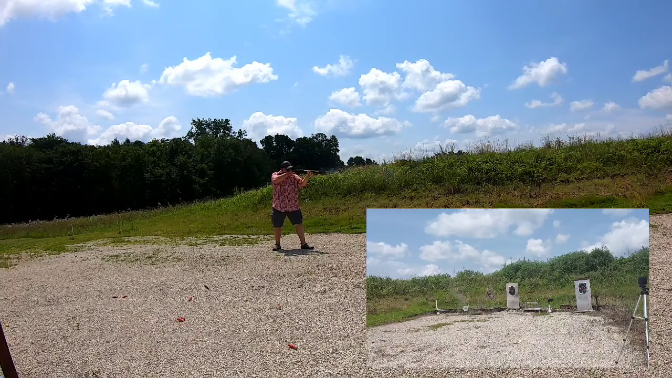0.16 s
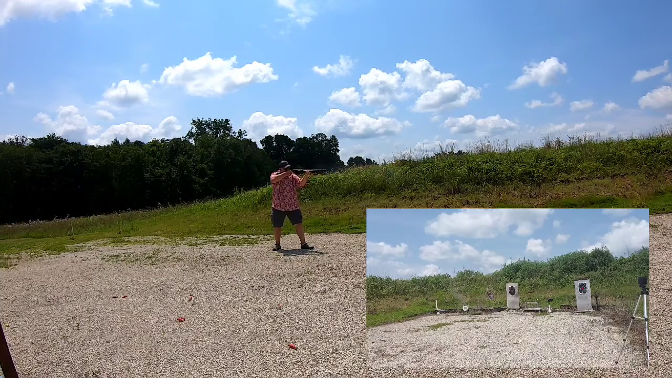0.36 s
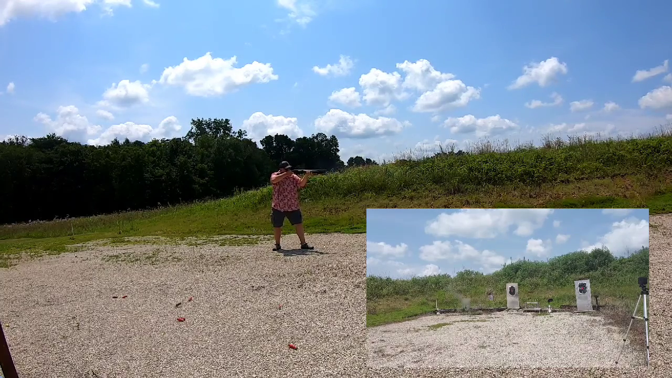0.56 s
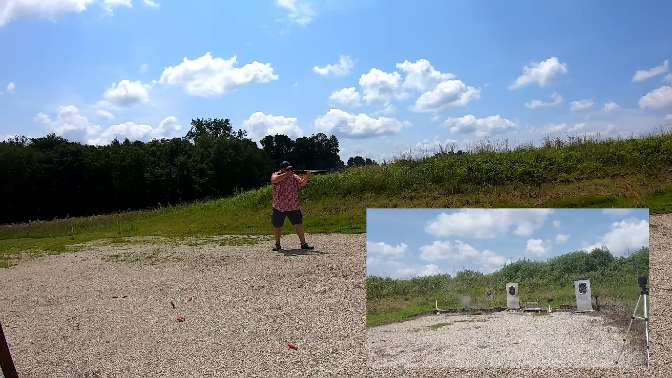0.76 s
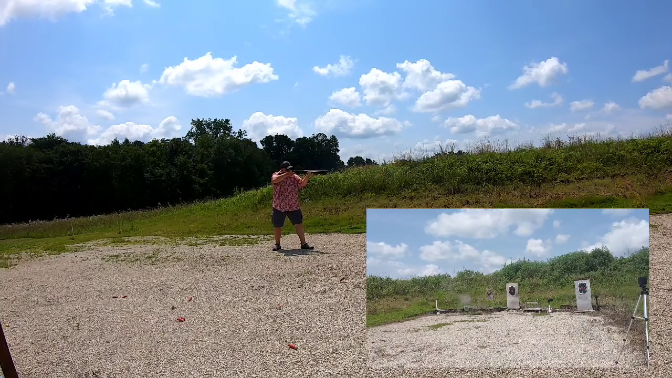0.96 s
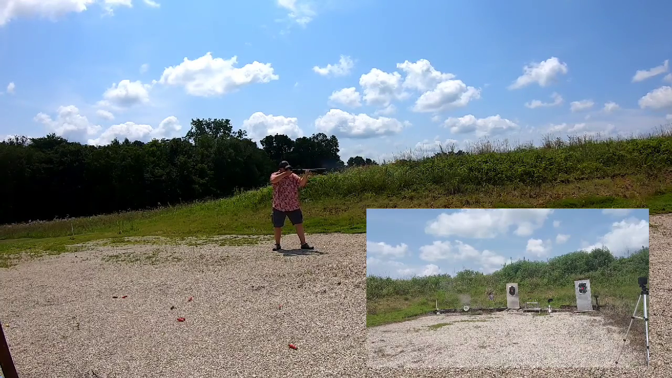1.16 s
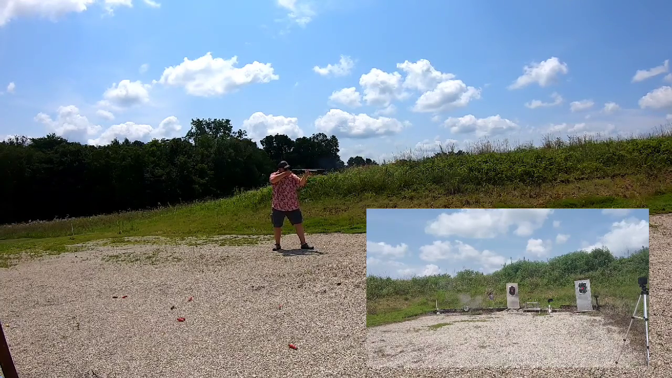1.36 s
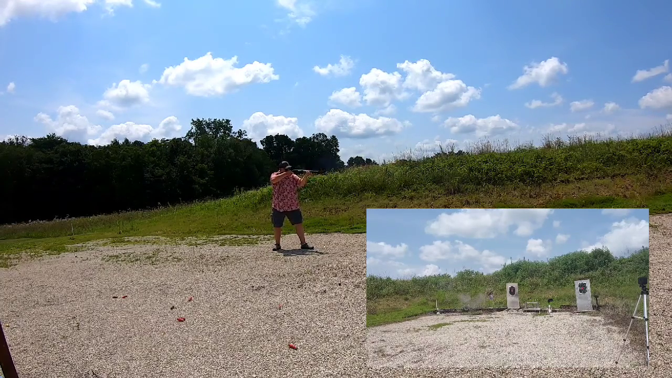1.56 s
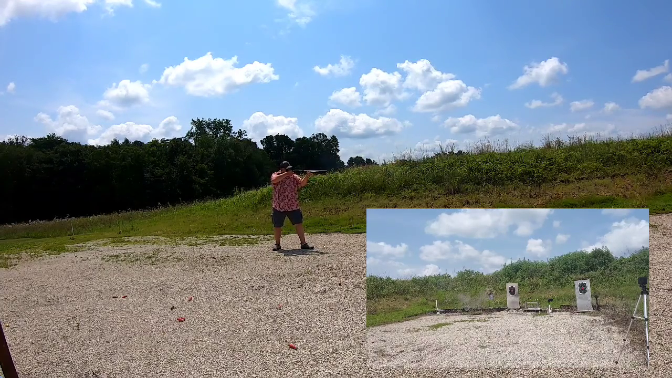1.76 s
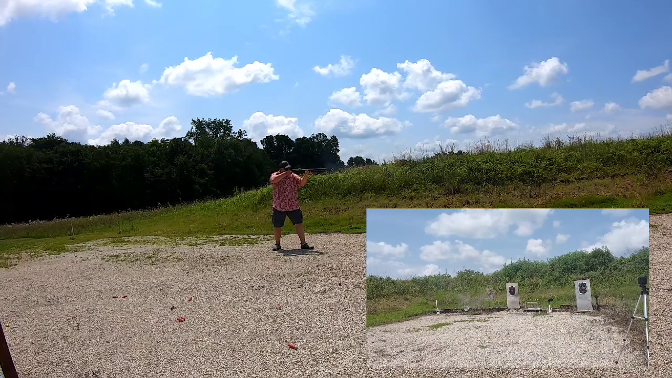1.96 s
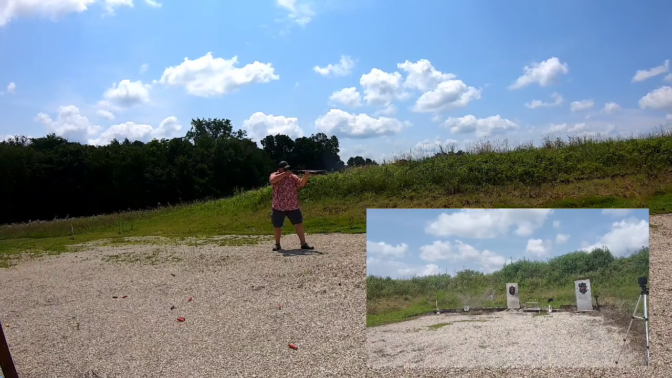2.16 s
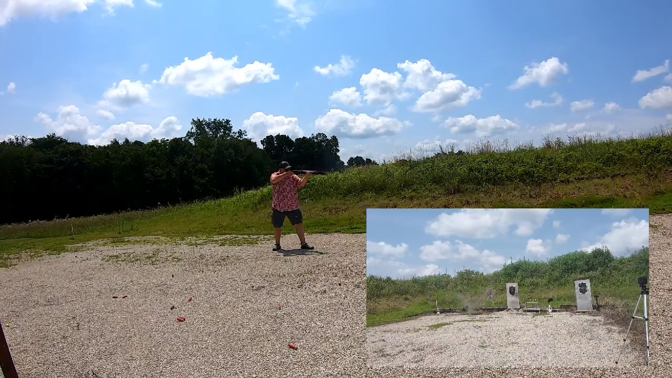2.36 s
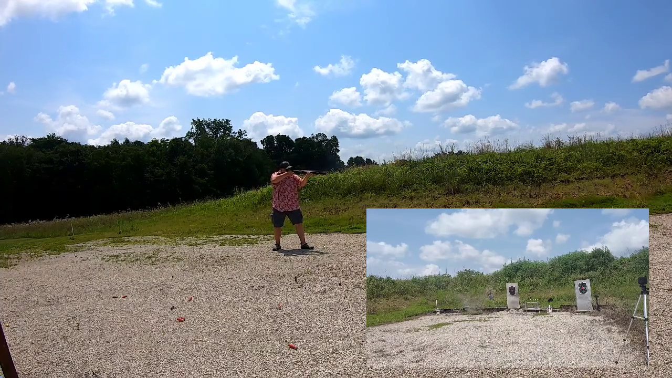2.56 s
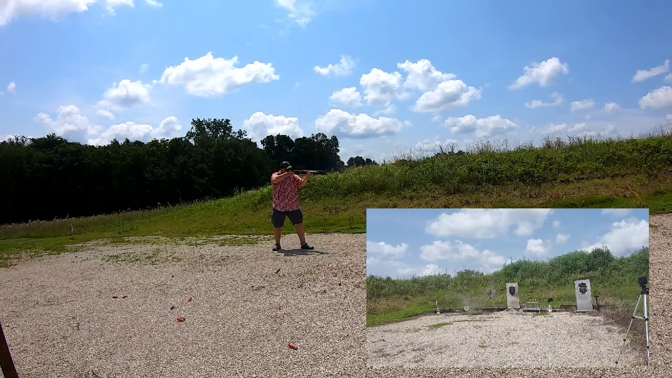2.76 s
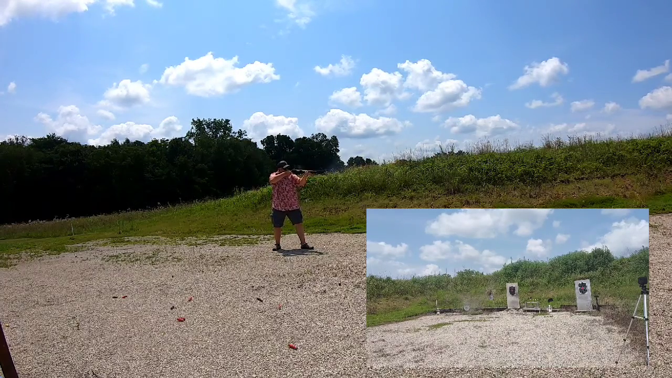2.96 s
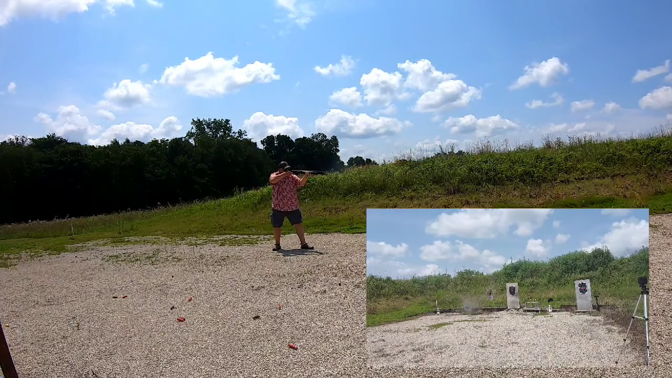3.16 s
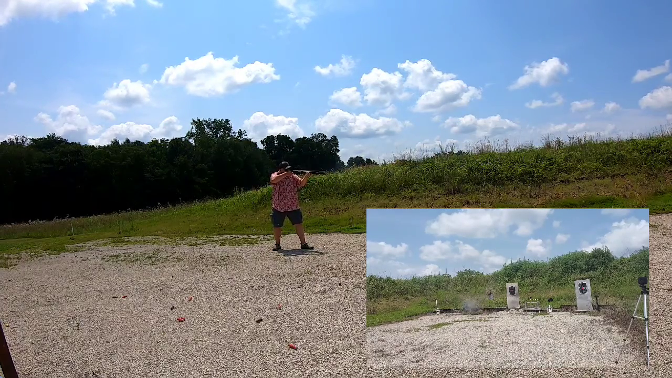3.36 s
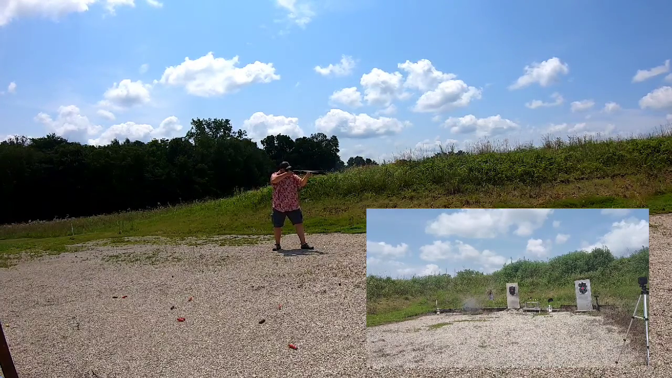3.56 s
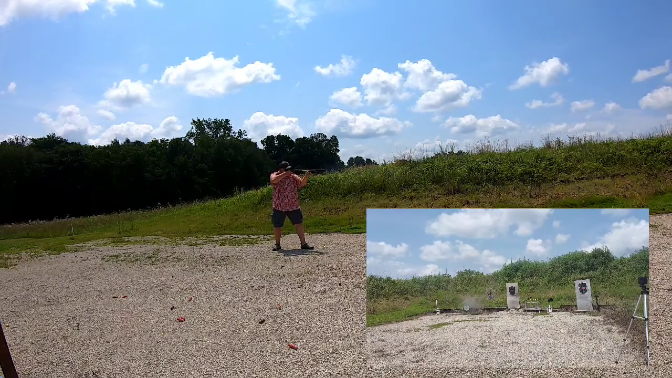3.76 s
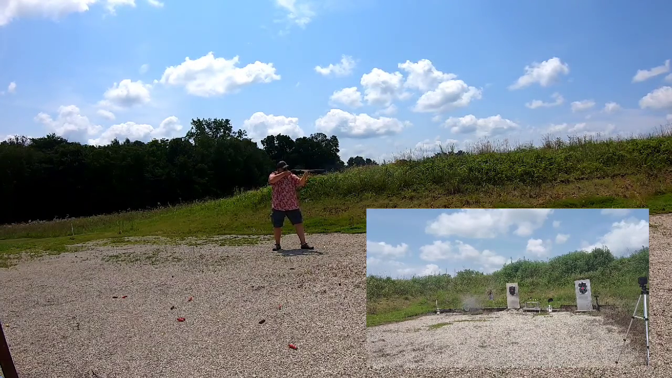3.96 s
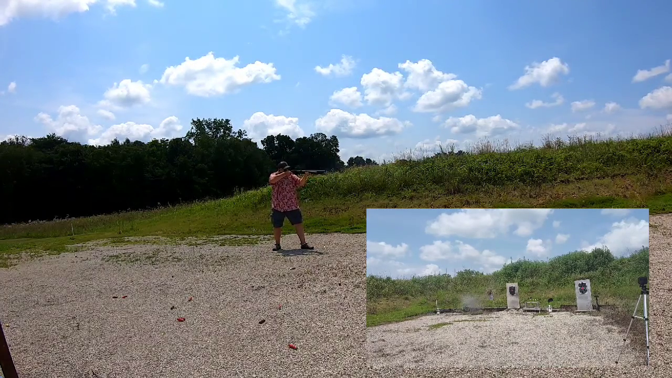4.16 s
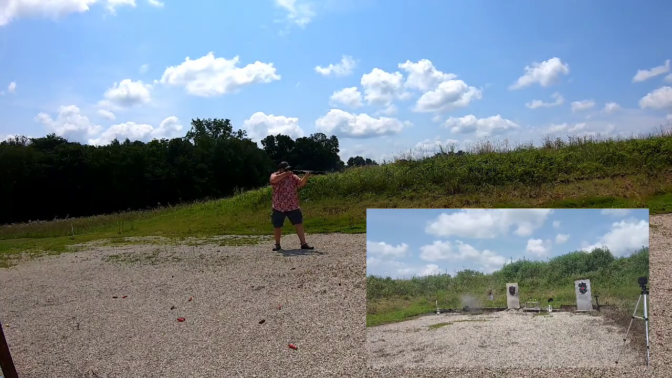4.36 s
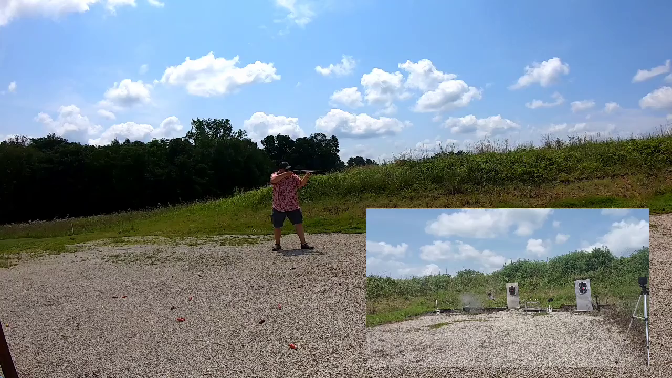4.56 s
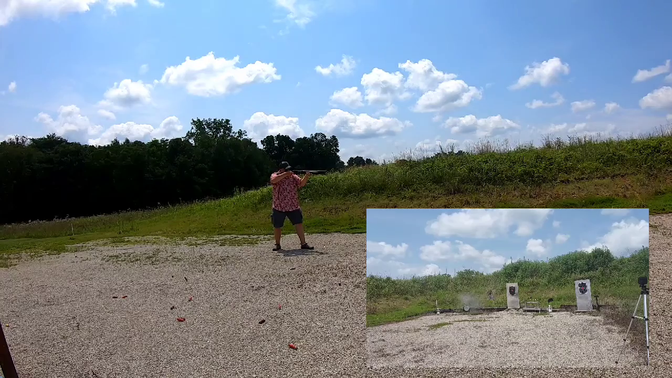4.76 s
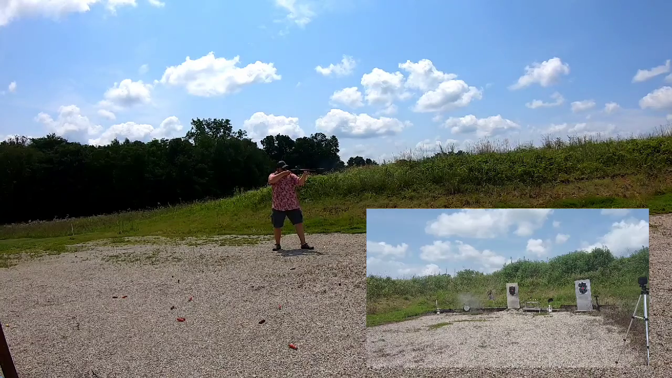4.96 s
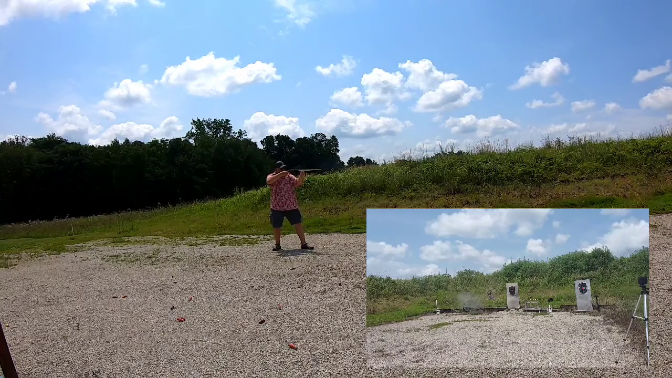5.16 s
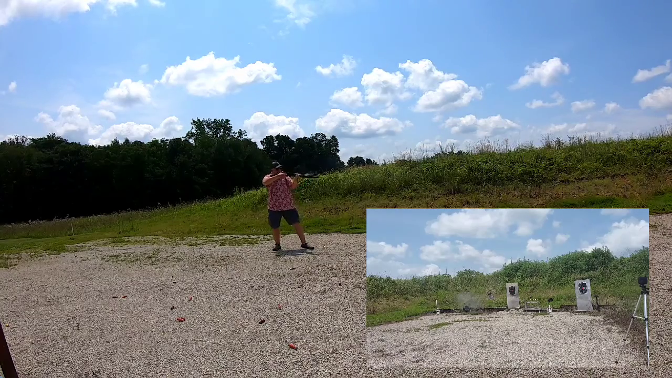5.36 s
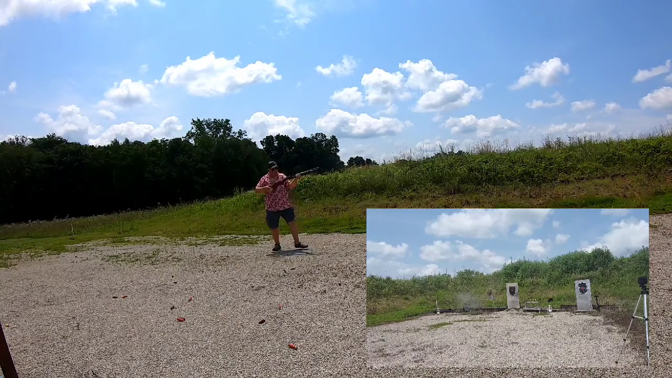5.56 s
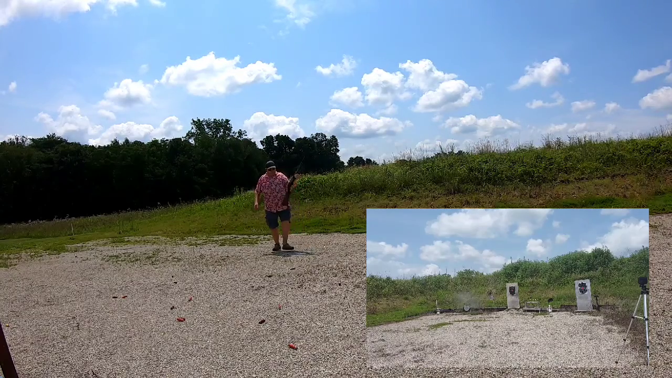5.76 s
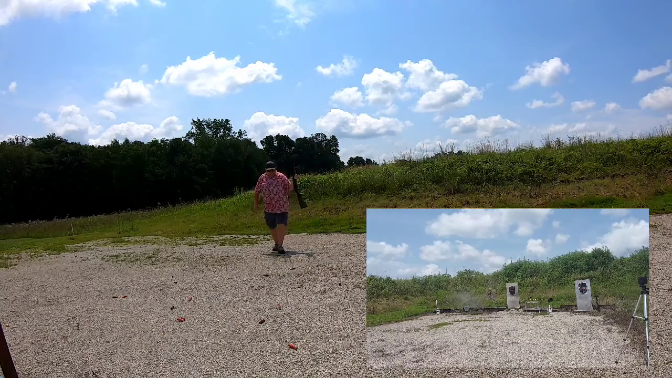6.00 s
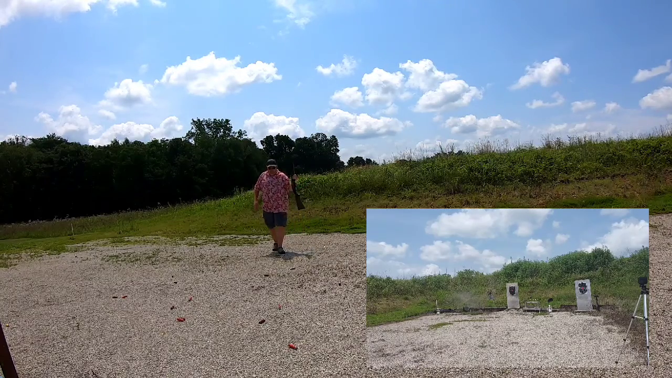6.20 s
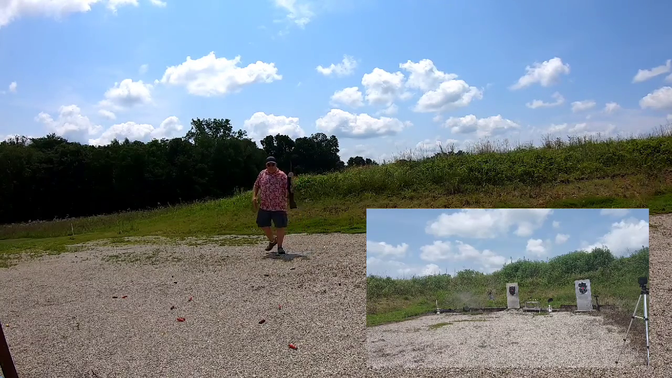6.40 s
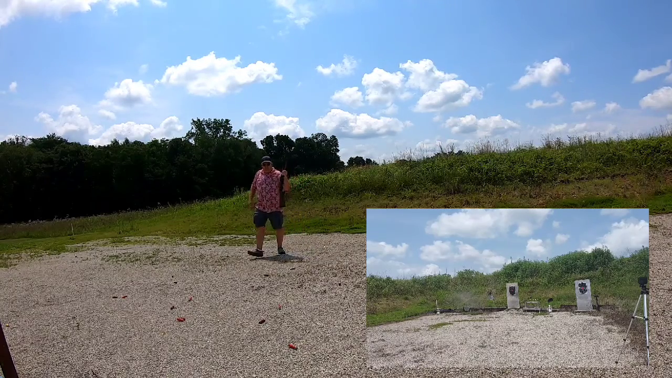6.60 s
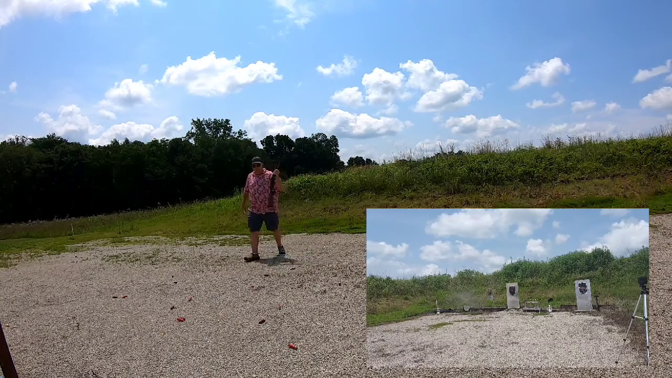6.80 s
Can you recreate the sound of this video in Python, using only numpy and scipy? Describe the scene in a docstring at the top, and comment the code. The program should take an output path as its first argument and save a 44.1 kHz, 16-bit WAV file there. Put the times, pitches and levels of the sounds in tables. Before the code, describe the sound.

Six booming, cracking shotgun shots come at an even pace in the open air, a few metres from a microphone that distorts on each one. After every blast the steel action rattles and rings softly, an echo rolls back from the woods, and a hollow shell drops lightly on gravel. After the last shot come a dull knock, a soft low bump, and a small squeak and click as the gun is lowered.

```python
"""An earlier shot is still rolling away over a gravel range, and an empty shell drops on the stones.
Then a semi-automatic shotgun fires six shots some metres off. Each blast overloads the microphone and
slaps off nearby surfaces; the gun's steel parts clack and ring, the shot comes back from an earth bank
and a line of woods, and another shell lands. Near the end come a few dull knocks and a low bump,
and the gun is lowered with a squeak and a last click."""
import sys
import numpy as np
from scipy import signal
from scipy.fft import rfft, irfft
from scipy.io import wavfile
from scipy.ndimage import uniform_filter1d

SR = 44100
rng = np.random.default_rng(int(sys.argv[2]) if len(sys.argv) > 2 else 0)


def wav_record(signal):
    """Record a signal, one row per channel, as 16-bit PCM in the file named by sys.argv[1]."""
    frames = np.transpose(np.atleast_2d(signal))
    bounded = np.clip(frames, -1, 1)
    # unit amplitude maps onto the largest positive 16-bit level
    quanta = np.round(bounded * 32767).astype(np.int16)
    wavfile.write(sys.argv[1], SR, quanta)


N = 301644
SHORT = 8192  # samples in one short sound
AGE_S, SHORT_HZ = np.arange(SHORT) / SR, np.fft.rfftfreq(SHORT, 1 / SR)
FRAME_S, FRAME_HZ = np.arange(N // 128 + 5) * 128 / SR, np.fft.rfftfreq(512, 1 / SR)  # grid for noise
BUILD_S = .002  # a burst takes this long to build


def amp(db):
    """Turns decibels into a gain."""
    return 10 ** (np.asarray(db) / 20)

def unit(x):
    """Scales a sound to the energy of one millisecond at full level."""
    return x * np.sqrt(SR / 1000 / np.sum(abs(x) ** 2))

def read(table, hz):
    """Looks up a table's value at any pitch, sliding between its rows."""
    pitch_hz, value = np.transpose(table)
    return np.interp(np.log(hz + 1), np.log(pitch_hz + 1), value)

def sides(pan_db):
    """Left and right gains with a steady total power; a pan above zero leans left."""
    gains = np.array([amp(pan_db / 2), amp(-pan_db / 2)])
    return gains / np.sqrt(np.mean(gains ** 2, axis=0))

def add(mix, start_s, sound, pan_db=0):
    """Mixes a sound in, cutting off whatever falls outside the scene."""
    start = round(start_s * SR)
    sound = (sound * sides(pan_db)[:, None])[:, max(-start, 0):]
    part = mix[:, max(start, 0):][:, :sound.shape[1]]
    part += sound[:, :part.shape[1]]

def envelope(t, swell_s, hold_s, fade_db_per_s):
    """A gain that is silent before time zero, swells, holds, then fades."""
    return np.clip(t / swell_s, 0, 1) * amp(-fade_db_per_s * np.maximum(t - swell_s - hold_s, 0))

# How alike the left and right microphones hear scattered sound: pitch_hz, likeness
LIKENESS = [(30, .5), (70, .98), (150, 1), (270, .995), (400, .95), (900, .6), (2200, 0.43), (5500, 0.27),
            (13000, 0.087)]
# How much of a pan they pick up: pitch_hz, share
PAN_SHARE = [(280, 0), (500, 0.7), (900, 0.99), (2500, 0.019), (6000, 0.049), (12000, 0.29)]
def wash(level, tone, pan_db, patchy_db, lowest_hz=55):
    """Scattered sound: patchy noise that follows a level, its bass alike on both sides."""
    a, b, c, d, patches = rng.standard_normal((5, len(FRAME_S), len(FRAME_HZ)))
    patches = uniform_filter1d(uniform_filter1d(patches, size=4, axis=0), size=14, axis=1)
    alike = read(LIKENESS, FRAME_HZ)
    left = a + 1j * b
    right = alike * left + np.sqrt(1 - alike ** 2) * (c + 1j * d)
    colour = amp(read(tone, FRAME_HZ))
    frames = np.array([left, right]) * colour / np.linalg.norm(colour)
    frames *= sides(pan_db * read(PAN_SHARE, FRAME_HZ))[:, None]
    frames *= level[:, None] * amp(patchy_db * patches / patches.std())
    noise = np.sqrt(1.5) * signal.istft(frames.transpose(0, 2, 1), nperseg=512, noverlap=384)[1][:, :N]
    return signal.lfilter(*signal.butter(2, lowest_hz, 'high', fs=SR), noise)

# The shots, the first fired before the scene begins; each db value turns one part up or down:
# start_s, body_db, crack_db, last_slap_delay_s, last_crackle_db, echo_db
SHOTS = [(-.205, 0, 0, .049, 0, 1), (0.6569, 2, -2, 0.05, -3.5, -0.5), (1.5577, 1.5, -1.5, .0484, -1, 0),
         (2.3765, 0.5, -1, 0.049, -4.5, -0.5), (3.293, 1.5, -2.2, .0484, -7, -0.5),
         (4.2295, 1.5, -2, 0.05, -4, -0.5), (5.2983, 1, -1.5, 0.048, -12, -0.5)]
# The echo from each place: delay_s, swell_s, hold_s, level_db, fade_db_per_s
ECHOES = {"gravel": (.002, .008, .052, -39.6, 215), "bank": (.19, .024, .004, -44.3, 150),
          "woods": (.266, .052, .046, -42.3, 69), "far": (.33, .09, .11, -49.6, 26)}
# The tone each place sends back: pitch_hz, level_db
GRAVEL_TONE = [(30, -2), (90, -3), (200, -5), (350, -9.5), (600, -14.5), (1200, -18.5), (3000, -15.5),
               (5000, -23.5), (7000, -27.5), (9500, -30.5), (12500, -38), (15000, -57)]
BANK_TONE = [(18, -52), (30, -28.5), (130, 7.5), (275, -17.5), (365, -30), (460, -19.5), (551, -35),
             (712, -16.5), (1290, -17), (2720, -11.5), (9350, -33), (12700, -48), (14100, -72)]
WOODS_TONE = [(18, -68), (30, -32), (54, -13.5), (141, -7), (177, -2), (202, -2), (415, -16.5), (610, -14),
              (731, -6.5), (1220, -0.5), (1540, -5.5), (3090, -7), (9110, -26.5), (12700, -38.5),
              (14100, -72)]
FAR_TONE = [(20, -24.5), (60, -14), (130, 4.5), (220, -1), (400, -7.5), (580, -8.5), (750, -4),
            (1250, -5.5), (1700, -8), (3600, -13.5), (5500, -27.5), (9000, -38.5), (12400, -45),
            (14100, -64.5)]
def echoes():
    """Every shot scatters back from the gravel, the bank, the woods and the far country."""
    def level(place):
        delay_s, swell_s, hold_s, level_db, fade_db_per_s = ECHOES[place]
        power = 0
        for start_s, *_, echo_db in SHOTS:
            shape = envelope(FRAME_S - start_s - delay_s, swell_s, hold_s, fade_db_per_s)
            power += (amp(level_db + echo_db) * shape) ** 2
        return np.sqrt(power)
    return (wash(level("gravel"), GRAVEL_TONE, pan_db=-11.5, patchy_db=4.5)
            + wash(level("bank"), BANK_TONE, pan_db=5, patchy_db=4.5)
            + wash(level("woods"), WOODS_TONE, pan_db=19, patchy_db=1.84)
            + wash(level("far"), FAR_TONE, pan_db=6.5, patchy_db=2.06))

# The hush of the open air: pitch_hz, level_db
AIR_TONE = [(18, -33), (30, -3), (70, 0), (207, -10.5), (346, -27.5), (1500, -22), (2940, -32),
            (6190, -42.5), (8880, -43), (14100, -56.5)]
def still_air(level_db=-60.5):
    """A faint, low, steady noise lies under everything."""
    return wash(np.full(len(FRAME_S), amp(level_db)), AIR_TONE, pan_db=-1.5, patchy_db=1.5)

def pulse(tone):
    """The shortest push of air that has this tone."""
    log_gain = np.log(amp(read(tone, abs(np.fft.fftfreq(SHORT, 1 / SR)))))
    spectrum = np.exp(np.conj(signal.hilbert(log_gain)))  # each pitch comes as early as it can
    return unit(np.fft.ifft(spectrum).real)

# How differently the two microphones hear a close sound: pitch_hz, difference_db
SIDE_DIFFERENCE = [(700, -8.5), (1300, -6.5), (2500, -10), (6000, -9), (9000, 0), (12000, -12)]
def burst(tone, decay_s, apart):
    """A puff of churning air builds and dies; `apart` makes left and right less alike."""
    t = AGE_S - BUILD_S
    shape = np.exp(np.where(t < 0, t * 4000, -t / decay_s))
    shared, different = rfft(rng.standard_normal((2, SHORT)) * shape)
    spectrum = shared + apart * amp(read(SIDE_DIFFERENCE, SHORT_HZ)) * np.array([different, -different])
    evened = spectrum / (abs(spectrum) + 1e-9) ** .6
    puff = irfft(evened * rfft(pulse(tone))) * (AGE_S < AGE_S[-1] / 2)
    return np.sqrt(2) * unit(puff)

# Empty shells landing: start_s, pop_db, grit_db, pan_db
SHELLS = [(.5, -42.5, -42, 1), (1.246, -43, -43, -2), (1.364, -50, -50, -3), (2.295, -42, -50, 3),
          (3.024, -37, -44, -1), (3.05, -60, -53, 2), (3.976, -53, -47, -2), (4.924, -46, -40, -1),
          (5.99, -47.5, -45.5, 1)]
# A gritty crackle, also heard on the slaps: pitch_hz, level_db
CRACKLE_TONE = [(300, -15.5), (1000, 4), (2300, 0), (4000, -1), (6000, -5.5), (9000, -12), (13000, -29),
                (15000, -46)]
def falling_shells(tube_hz=1290, ring_s=.039):
    """Each hollow shell pops near its tube's pitch and scuffs the gravel."""
    out = np.zeros((2, N))
    for start_s, pop_db, grit_db, pan_db in SHELLS:
        pop = np.sin(2 * np.pi * tube_hz * rng.uniform(.97, 1.03) * AGE_S)
        add(out, start_s, pop * amp(pop_db - 60 * AGE_S / ring_s), pan_db)
        add(out, start_s - BUILD_S, amp(grit_db) * burst(CRACKLE_TONE, decay_s=.0035, apart=1.2), pan_db)
    return out

def from_right(x, lag_s):
    """The left microphone hears a sound from the right a moment later."""
    return np.array([np.interp(AGE_S - lag_s, AGE_S, x, left=0), x])

# The push of the gas, its hollow bark and the shock wave's crack: pitch_hz, level_db
BOOM_TONE = [(15, -10.5), (40, -0.5), (90, -3.5), (150, 6.5), (220, -6), (330, -15.5), (600, -26),
             (2000, -55.5)]
BARK_TONE = [(150, -35), (350, -21), (480, -7.5), (620, -3.5), (800, 1.5), (920, -4), (1080, -16.5),
             (2500, -49)]
CRACK_TONE = [(300, -32.5), (900, -10.5), (1300, 2), (2200, 1.5), (3000, 1), (3800, -1), (5000, -7),
              (6300, -11), (7500, -19.5), (9300, -17), (10500, -28), (13000, -25.5), (14500, -48)]
def blasts(stutter_gap_s=.0103, dull_hz=4400, bounce_s=.001368):
    """After a faint tick, boom, bark and crack stutter in; the crack bounces off the gravel."""
    out = np.zeros((2, N))
    boom = amp(-6.3) * from_right(pulse(BOOM_TONE), lag_s=.00016)
    bark = amp(-4.2) * from_right(pulse(BARK_TONE), lag_s=.0001)
    dull = signal.butter(1, dull_hz, fs=SR)
    for start_s, body_db, crack_db, *_ in SHOTS:
        tick = amp(-47) * burst(CRACK_TONE, decay_s=.0015, apart=.9)
        add(out, start_s - .0425 - BUILD_S, tick)
        for step in range(4):  # step 0 is the main blast; the others come earlier and weaker
            at_s, drop = start_s - step * stutter_gap_s, step ** 1.25
            if step == 0:
                crack = burst(CRACK_TONE, decay_s=.0008, apart=.8)
            else:
                crack = amp(-10.5) * signal.lfilter(*dull, burst(CRACK_TONE, decay_s=.0015, apart=1.3))
            crack *= amp(crack_db - 3.1 - 10.5 * drop)
            body_gain = amp(body_db - 9.3 * drop)
            add(out, at_s + .00037, -body_gain * boom)
            add(out, at_s - .0011, body_gain * bark, pan_db=-1)
            add(out, at_s - BUILD_S, crack)
            add(out, at_s - BUILD_S + bounce_s, amp(-6) * crack)
    return out

# Pushes of air around each shot: delay_s, level_db
PUSHES = [(-.007, -22.7), (.038, -24.7)]
# A deep thud, also heard in the low bump: pitch_hz, level_db
THUD_TONE = [(30, -1), (70, -5), (200, -21), (600, -40), (2000, -70)]
def pressure_waves():
    """The pressure wave sweeps across the two microphones and pushes them unequally."""
    out = np.zeros((2, N))
    push = np.outer([1, -1], pulse(THUD_TONE))
    for start_s, *_ in SHOTS:
        for delay_s, level_db in PUSHES:
            add(out, start_s + delay_s, amp(level_db) * push)
    return out

def whine(hz, rough):
    """A wavering tone that follows a pitch curve."""
    a, b = uniform_filter1d(rng.standard_normal((2, SR)), size=256, axis=1)[:, :len(hz)] * np.sqrt(128)
    waver = 1 + rough * (a + 1j * b)
    return (waver * np.exp(2j * np.pi * np.cumsum(hz) / SR)).real

# High notes of the steel: loudest_s, length_s, level_db
NOTES = [(.73, .1, -42.5), (2.516, .161, -34), (4.302, .07, -44), (4.39, .15, -55)]
# The tones inside each note: pitch_hz, level_db
NOTE_TONES = [(1190, -19), (5082, -1), (8969, -19.5), (10481, -27.5), (12861, -33)]
def singing_steel(ends_db=-26):
    """After some shots one high note of the steel swells and stops."""
    out = np.zeros((2, N))
    for loudest_s, length_s, level_db in NOTES:
        n = round(length_s * SR)
        swell = amp(level_db + ends_db * np.linspace(-1, 1, n) ** 2) * signal.windows.tukey(n, .15)
        note = sum(amp(db) * whine(np.full(n, hz), rough=.18) for hz, db in NOTE_TONES)
        add(out, loudest_s - length_s / 2, swell * note, pan_db=-10)
    return out

# The first two slaps, and the deeper last one: pitch_hz, level_db
EARLY_SLAP_TONE = [(30, -13.5), (100, -5), (200, -6.5), (350, 0.5), (450, -11.5), (700, -23), (1200, -30),
                   (4000, -57)]
DEEP_SLAP_TONE = [(25, -1), (70, 4), (140, 4.5), (230, -2), (350, -13.5), (600, -19), (1200, -46),
                  (4000, -64.5)]
def slaps(first_s=.037, middle_s=.0462):
    """Each blast bounces off hard surfaces nearby three times; the first and last slaps crackle."""
    out = np.zeros((2, N))
    early, deep = pulse(EARLY_SLAP_TONE), pulse(DEEP_SLAP_TONE)
    for start_s, _, _, last_s, crackle_db, _ in SHOTS:
        add(out, start_s + first_s + .001, -amp(-15) * from_right(early, lag_s=.00034), pan_db=-4)
        add(out, start_s + middle_s, amp(-19) * early, pan_db=-5)
        add(out, start_s + last_s + .002, -amp(-12) * deep, pan_db=3.5)
        first_crackle = amp(-26.7) * burst(CRACKLE_TONE, decay_s=.002, apart=2.2)
        last_crackle = amp(crackle_db - 15) * burst(CRACKLE_TONE, decay_s=.0018, apart=2.8)
        add(out, start_s + first_s - BUILD_S, first_crackle, pan_db=-6)
        add(out, start_s + last_s - BUILD_S, last_crackle, pan_db=-6)
    return out

# The tones the gun's steel rings with: pitch_hz, level_db, ring_s (time to fade by 60 dB)
STEEL_TONES = [(2000, -15, .15), (2780, -7, 0.17), (3138, -8, 0.39), (3540, -25, .15), (3800, -12, 0.19),
               (4355, -6.5, .12), (4760, -11, .12), (5095, -8, 0.48), (5685, -13.5, .2), (6465, -9, .2),
               (6800, -9, 0.32), (7628, -13, 0.18), (8550, -7.5, .17), (8990, -17, .3), (11070, -31.5, .4),
               (11666, -20.5, .25), (12880, -26, .2)]
def steel_ring(rise_s, struck_hz, grip_db_per_s, others_db=-4.5):
    """Struck steel rings most near struck_hz; each tone throbs, and the hands damp them all."""
    t = np.arange(SR // 3) / SR
    hz, db, ring_s = np.transpose(STEEL_TONES)[:, :, None]
    struck = np.exp(-(np.log(hz / struck_hz) / .06) ** 2)
    strength_db = (1 - struck) * (db + others_db + 2 * rng.standard_normal(db.shape))
    phase = 2 * np.pi * rng.random(db.shape) + 1.1 * rng.standard_normal((2, *db.shape))
    throb = 1.4 + .7 * np.cos(2 * np.pi * (rng.uniform(15, 70, db.shape) * t + rng.random(db.shape)))
    fade = amp(strength_db - (60 / ring_s + grip_db_per_s) * t)
    tones = fade * throb * np.sin(2 * np.pi * hz * t + phase)
    return tones.sum(1) * (1 - np.exp(-t / rise_s))

# Steel hitting steel: pitch_hz, level_db
CLACK_TONE = [(300, -15), (800, -0.5), (1600, 3.5), (2500, 5), (4200, 4.5), (5500, -4), (8000, -13.5),
              (12500, -26), (15000, -37)]
def reloading(delay_s=.046, rattle_s=.054):
    """After each shot the bolt slides back and forth, rattling and setting the steel ringing."""
    out = np.zeros((2, N))
    for start_s, *_ in SHOTS:
        ring = steel_ring(rise_s=.006, struck_hz=8550, grip_db_per_s=200, others_db=0)
        add(out, start_s + delay_s, amp(-46.5) * ring, pan_db=-14)
        for late, size in rng.random((3, 2)):
            rattle = amp(-44 + 3.3 * size - 10.6 * late) * burst(CLACK_TONE, decay_s=.002, apart=2.4)
            add(out, start_s + delay_s + rattle_s * late, rattle, pan_db=-28)
    return out

def glide(from_hz, to_hz, glide_s):
    """A pitch that slides quickly at first, then settles."""
    return to_hz + (from_hz - to_hz) * np.exp(-AGE_S / glide_s)

def flutter(delay_s=.052):
    """Quick echoes spread out as their paths lengthen, so a rough tone slides down to a hum."""
    out = np.zeros((2, N))
    pitch_hz = glide(from_hz=520, to_hz=132, glide_s=.017)
    level = amp(-32.5) * envelope(AGE_S, swell_s=.028, hold_s=.008, fade_db_per_s=490)
    for start_s, *_ in SHOTS:
        add(out, start_s + delay_s, level * whine(pitch_hz, rough=.45))
    return out

# The gun's parts snapping home: start_s, hit_db, decay_s, ring_db, struck_hz, pan_db
CLACKS = [(.765, -42.5, .005, -54, 3800, -2), (.787, -38, .0044, -50, 4355, -13),
          (.797, -39.5, .009, -41.5, 3140, -15), (1.657, -43, .008, -54, 3800, 0),
          (1.694, -44, .01, -55, 3140, -17), (2.472, -49, .01, -51, 2780, -3),
          (2.581, -39.5, .02, -50, 4355, -13), (3.382, -47, .02, -50, 3140, -9),
          (3.431, -58, .008, -48, 3900, -14), (4.324, -42.5, .01, -47, 3140, -3),
          (4.351, -46, .009, -47.5, 3140, -19), (5.353, -46, .003, -39.5, 3800, -16),
          (5.385, -51, .007, -44.5, 2780, -13), (5.39, -52, .006, -47.5, 3140, -19),
          (6.3975, -49, .005, -69, 3800, 1), (6.466, -36, .005, -53.5, 3140, -11)]
def clacks(lowered_s=5.7):
    """Steel parts hit and ring; the hands damp the ringing until the gun is lowered."""
    out = np.zeros((2, N))
    for start_s, hit_db, decay_s, ring_db, struck_hz, pan_db in CLACKS:
        length_gain = np.sqrt(decay_s / .00089)  # a longer hit carries more energy
        hit = length_gain * burst(CLACK_TONE, decay_s, apart=1.9)
        ring = steel_ring(.00085, struck_hz, grip_db_per_s=110 if start_s < lowered_s else 0)
        add(out, start_s - BUILD_S, amp(hit_db) * hit, pan_db)
        add(out, start_s, amp(ring_db) * ring, pan_db / 2)
    return out

# Dull knocks: start_s, level_db, pan_db
KNOCKS = [(5.188, -34.5, 17), (6.256, -32, 20), (6.319, -46.5, 15)]
# Their tone: pitch_hz, level_db
KNOCK_TONE = [(150, -23), (500, -5), (900, 5.5), (1300, 10), (2000, -19.5), (4000, -30), (12000, -42),
              (15000, -37)]
def knocks():
    """A few short, dull knocks come from the left."""
    out = np.zeros((2, N))
    for start_s, level_db, pan_db in KNOCKS:
        add(out, start_s - BUILD_S, amp(level_db) * burst(KNOCK_TONE, decay_s=.004, apart=.9), pan_db)
    return out

def low_bump(start_s=6.262):
    """A soft, deep noise swells and quickly dies."""
    level = amp(-46) * envelope(FRAME_S - start_s, swell_s=.02, hold_s=.005, fade_db_per_s=190)
    return wash(level, THUD_TONE, pan_db=0, patchy_db=1.5, lowest_hz=11)

def squeak(start_s=6.361, octave_db=-18):
    """Steel slides on steel as the gun is lowered; the pitch sags as it slows."""
    out = np.zeros((2, N))
    pitch_hz = glide(from_hz=4020, to_hz=3650, glide_s=.025)
    level = amp(-54) * envelope(AGE_S, swell_s=.005, hold_s=.004, fade_db_per_s=250)
    tone = whine(pitch_hz, rough=.86) + amp(octave_db) * whine(2 * pitch_hz, rough=.78)
    add(out, start_s, level * tone)
    return out

def scene():
    """The shots, the range around them, the gun's steel and the small sounds, added together."""
    shots = blasts() + pressure_waves() + slaps() + flutter()
    outdoors = echoes() + still_air()
    gun = reloading() + clacks() + singing_steel() + squeak()
    return shots + outdoors + gun + falling_shells() + knocks() + low_bump()

def record(dry, highest_hz=14200):
    """The blasts overload the microphone and flatten; then the highest treble is cut away."""
    flattened = dry / (1 + dry ** 8) ** (1 / 8)
    treble_cut = signal.firwin(151, highest_hz, window=("kaiser", 7), fs=SR)
    return signal.oaconvolve(flattened, treble_cut[None], "same")


dry = scene()
out = record(dry)
wav_record(out)
```